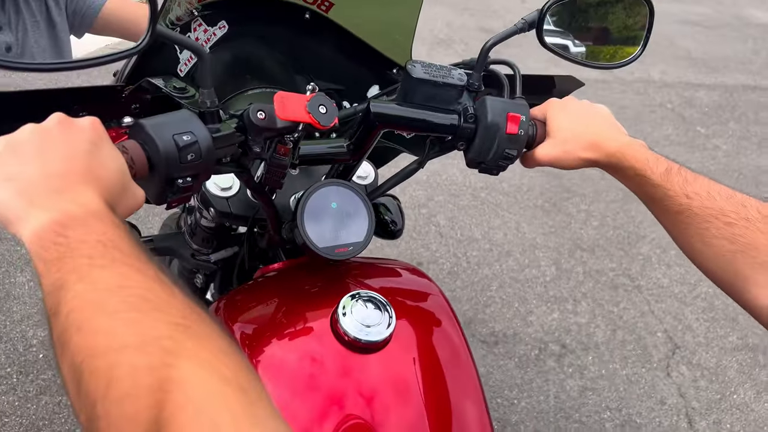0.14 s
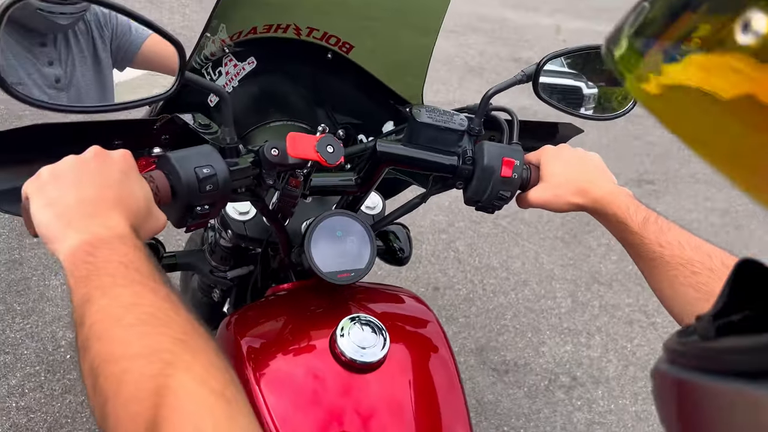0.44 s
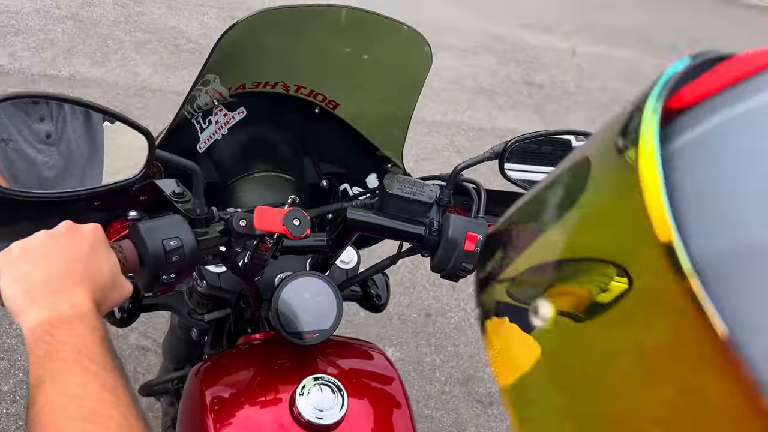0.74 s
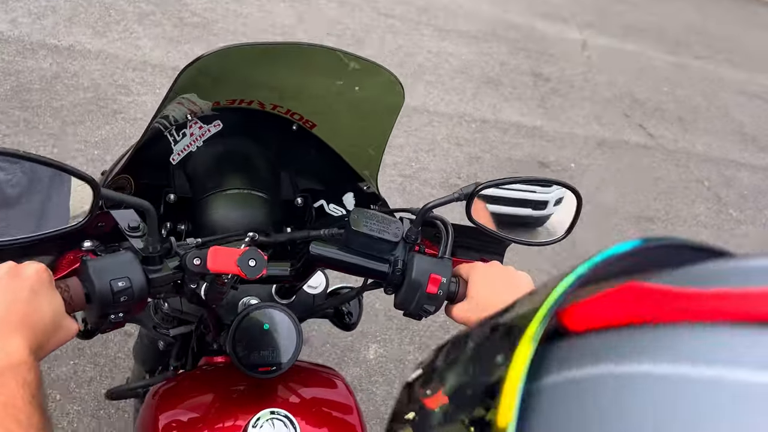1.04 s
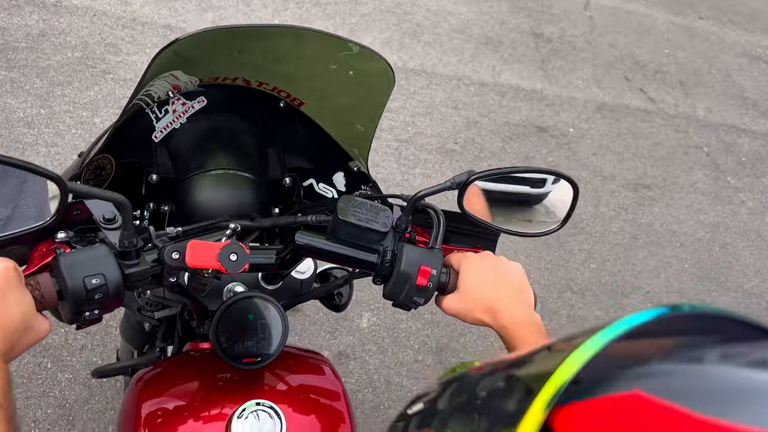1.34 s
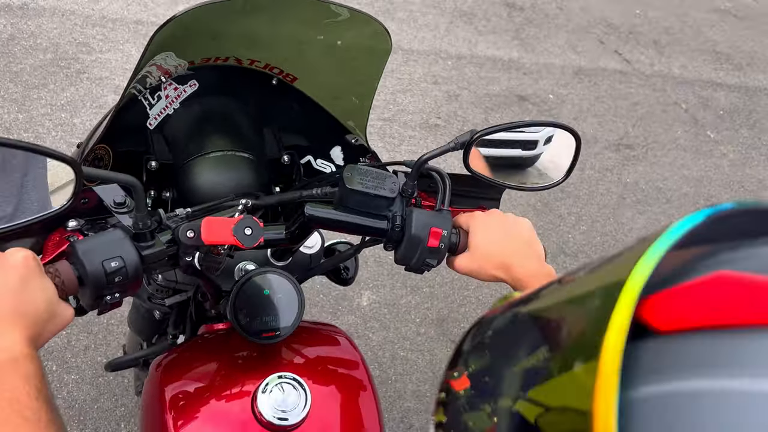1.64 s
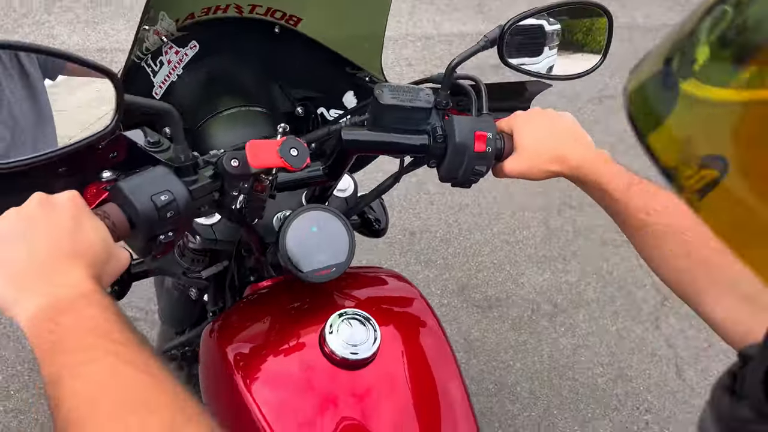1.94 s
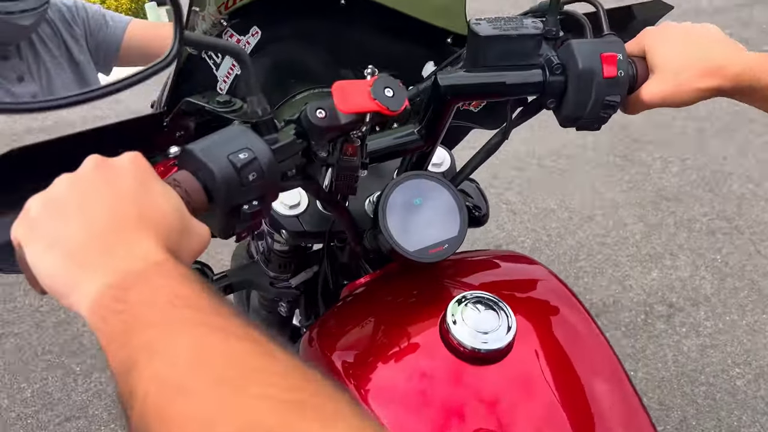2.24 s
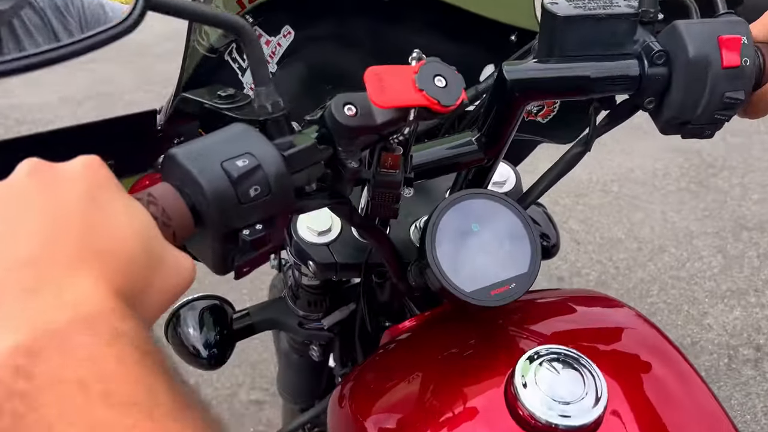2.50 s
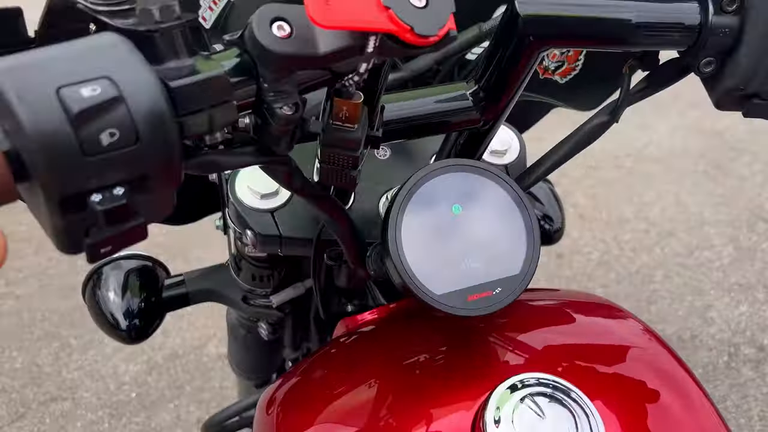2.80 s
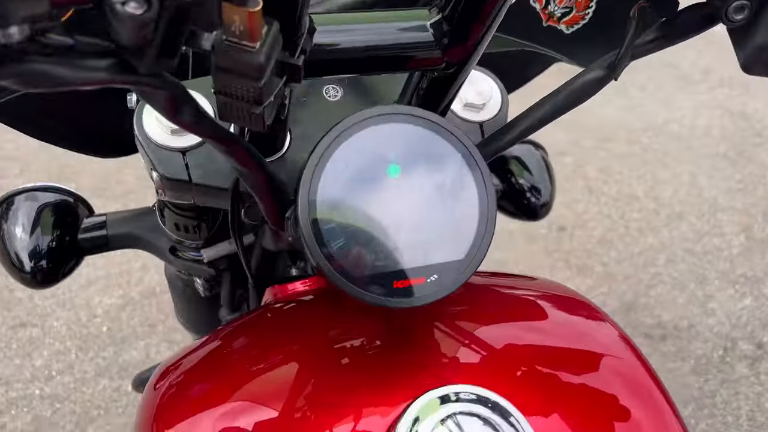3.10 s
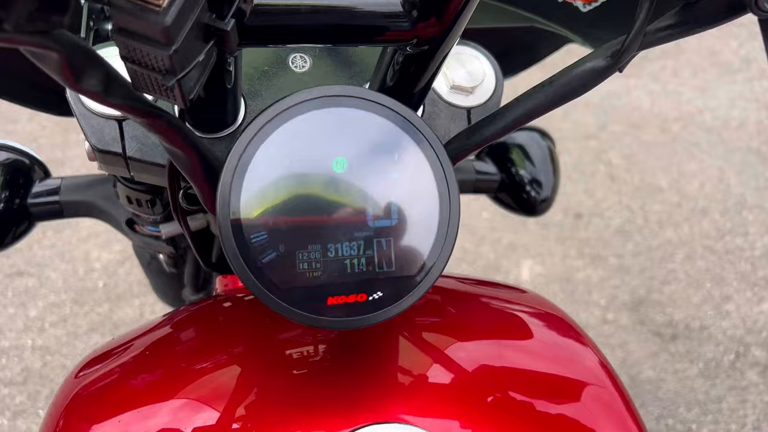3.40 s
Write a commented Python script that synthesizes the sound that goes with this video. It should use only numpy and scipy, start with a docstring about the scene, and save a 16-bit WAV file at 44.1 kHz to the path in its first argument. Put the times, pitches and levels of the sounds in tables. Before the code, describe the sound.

Motorcycle engine at steady idle outdoors: deep uneven puffs, soft intake gulps, rapid ticking and gear noise. The handheld microphone leans in past the middle, bringing the clatter nearer, with no revving.

```python
"""A loping thump, gulps of air and a metallic whirr: a V-twin motorcycle idles in a driveway.
It is heard from above the saddle, then from close over the tank. Exhaust puffs and intake gulps ring
air modes; the front cylinder fires every cycle, the rear hard only on every second, bar one slip.
Valve ticks ride on coloured noise for gears and chains; knocks and pings ring metal; bands of hiss
swell and fade. One crank-speed curve times the strokes, ticks and knocks."""
import sys
import numpy as np
from scipy import signal
from scipy.fft import rfft, irfft
from scipy.io import wavfile
from scipy.ndimage import uniform_filter1d, map_coordinates

SR = 44100
rng = np.random.default_rng(int(sys.argv[2]) if len(sys.argv) > 2 else 0)


def output_pcm(signal):
    """Save a mono or channel-first signal as 16-bit PCM at the path in sys.argv[1].

    Samples are clipped to [-1, 1] before scaling.
    """
    pcm = np.clip(np.atleast_2d(signal).T, -1, 1) * 32767
    wavfile.write(sys.argv[1], SR, np.round(pcm).astype(np.int16))


N = 156555
TIME = np.arange(N) / SR
RUN_IN = SR // 2   # samples before time zero, so that resonances already ring


def from_db(db):
    """Decibels to amplitude gain."""
    return 10 ** (np.asarray(db) / 20)


def rms_one(x):
    """Scale to rms 1."""
    return x / np.sqrt(np.mean(x ** 2) + 1e-20)


def level_curve(table):
    """Gain over time from a table of t/s, level/dB."""
    return from_db(np.interp(TIME, *np.transpose(table)))


def drift(rate_hz):
    """Slow random signal of rms 1: noise through a two-pole low-pass at 1/40 of the sample rate."""
    step = 40
    pole = np.exp(-2 * np.pi * rate_hz * step / SR)
    white = rng.standard_normal(N // step + 2002)
    slow = signal.lfilter([1], [1, -2 * pole, pole ** 2], white)[2000:]
    return np.interp(np.arange(N) / step, np.arange(len(slow)), rms_one(slow))


def noise(spectrum):
    """Noise of rms 1 shaped by f/Hz, density/dB; falls 12 dB per octave more below the first point."""
    hz, db = np.transpose(spectrum)
    f = np.maximum(np.fft.rfftfreq(N, 1 / SR), 1)
    gain = from_db(np.interp(np.log(f), np.log(hz), db))
    gain = gain * np.minimum(f / hz[0], 1) ** 2
    return rms_one(irfft(rfft(rng.standard_normal(N)) * gain, N))


def clicks(times_s, db, scatter_db=0):
    """Impulse train with random level scatter, starting a run-in before time zero."""
    train = np.zeros(RUN_IN + N)
    at = np.round(times_s * SR).astype(int) + RUN_IN
    gain = from_db(db + scatter_db * rng.standard_normal(len(at)))
    inside = (at >= 0) & (at < len(train))
    train[at[inside]] = gain[inside]
    return train + 1e-18   # offset avoids denormals


def bursts(train, decay_s):
    """Each impulse becomes an exponential decay; run-in removed."""
    return signal.lfilter([1], [1, -np.exp(-1 / (decay_s * SR))], train)[RUN_IN:]


def ring(train, hz, t60_s):
    """Damped mode: a unit impulse starts a decaying sine of height 1; run-in removed."""
    pole = np.exp(-np.log(1000) / (t60_s * SR))
    w = 2 * np.pi * hz / SR
    return signal.lfilter([0, np.sin(w)], [1, -2 * pole * np.cos(w), pole ** 2], train)[RUN_IN:]


def resonance(x, hz, width_hz):
    """Two-pole band-pass with peak gain near 1."""
    pole = np.exp(-np.pi * width_hz / SR)
    b = np.array([1, 0, -1]) * (1 - pole ** 2) / 2
    return signal.lfilter(b, [1, -2 * pole * np.cos(2 * np.pi * hz / SR), pole ** 2], x)


LEAN_START_S, LEAN_END_S = 2.24, 2.648


def nearness(t):
    """Microphone position: 0 over the saddle, 1 over the tank."""
    return np.interp(t, [LEAN_START_S, LEAN_END_S], [0, 1])


# crank speed: t/s, speed/rpm
CRANK_SPEED = [(0.0, 1109), (0.21, 1127), (0.42, 1073), (0.63, 1072), (0.84, 1130), (1.04, 1128),
               (1.25, 1086), (1.46, 1074), (1.67, 1114), (1.88, 1122), (2.09, 1134), (2.3, 1146),
               (2.51, 1157), (2.71, 1115), (2.92, 1113), (3.13, 1114), (3.34, 1117), (3.55, 1137)]
FIRST_FIRING_S = .0571
LOPE_SLIP_S = 2.39   # the rear cylinder fires hard twice running here
HURRY_S = 0.00066    # a hard rear stroke brings the next cycle forward


def cycles(degrees=0):
    """Times at which the crank passes an angle in each 720-degree cycle; flags hard rear strokes."""
    t = np.arange(-RUN_IN, N + RUN_IN) / SR
    rpm = np.interp(t, *np.transpose(CRANK_SPEED))
    cycle_count = np.cumsum(rpm) / (120 * SR)   # two turns per cycle
    k = np.arange(-3, 34)
    firing_count = k + np.interp(FIRST_FIRING_S, t, cycle_count)
    after_slip = np.interp(firing_count, cycle_count, t) > LOPE_SLIP_S
    hard = (k % 2 == 1) ^ after_slip
    times = np.interp(firing_count + degrees / 720, cycle_count, t)
    return times - HURRY_S * np.roll(hard, 1), hard


PUFF_WIDTH_S = 0.00072   # length of each of three smoothings


def rounded(train):
    """A valve opens gradually: each impulse becomes a small bell-shaped puff."""
    for _ in range(3):
        train = uniform_filter1d(train, max(int(PUFF_WIDTH_S * SR), 1))
    return train


PUFF_SCATTER_DB = .5


def puffs(degrees, db=0, which=slice(None)):
    """Pressure puffs at a crank angle, in the chosen cycles."""
    return rounded(clicks(cycles(degrees)[0][which], db, PUFF_SCATTER_DB))


def pipe(train, modes):
    """Puffs ring the air modes of a pipe; neighbouring modes swing in opposite directions."""
    near = nearness(TIME)
    out = 0
    for k, (hz, t60_s, saddle_db, tank_db) in enumerate(modes):
        gain = from_db(saddle_db) * (1 - near) + from_db(tank_db) * near
        out = out + (-1) ** k * ring(train, hz, t60_s) * gain
    return out


# exhaust air modes, front and rear: f/Hz, t60/s, saddle level/dB, tank level/dB
FRONT_PIPE_MODES = [(67.02, 0.3, -3, -3.5), (77.3, 0.079, 0, -1.8), (129.13, 0.31, -7, -5),
                    (168.5, 0.27, -7, -6), (246, 0.03, -10.5, -7), (287.9, 0.16, -18.5, -22.5)]
REAR_PIPE_MODES = [(71.17, 0.58, -9, -25), (113.9, 0.25, -6.3, -15), (174.1, 0.16, -6.5, -3),
                   (247.1, 0.017, -21, -12)]
# low hum after a weak rear stroke: f/Hz, t60/s, saddle level/dB, tank level/dB
BOOM_MODES = [(65.5, 0.6, -9, -15.5)]
# gas turbulence colour: f/Hz, relative density/dB
GAS_COLOUR = [(25, -26), (45, -9), (100, 4.5), (170, -4), (310, -1.5), (350, -13), (400, -21), (500, -40),
              (700, -16), (2000, -65)]
HARD_DEG, WEAK_DEG, BOOM_DEG = 327.5, 283, 349   # crank angle after the front puff
REAR_WEAK_DB, GAS_DB, GAS_DECAY_S = -8, -26.5, 0.081


def exhaust(hard):
    """Front and rear puffs ring the pipes; turbulent gas rushes behind each, a hum follows weak strokes."""
    front = puffs(0)
    rear = puffs(HARD_DEG, 0, hard) + puffs(WEAK_DEG, REAR_WEAK_DB, ~hard)
    thump = pipe(front, FRONT_PIPE_MODES) + pipe(rear, REAR_PIPE_MODES)
    boom = pipe(puffs(BOOM_DEG, 0, ~hard), BOOM_MODES)
    gas = from_db(GAS_DB) * bursts(front + rear, GAS_DECAY_S) * noise(GAS_COLOUR)
    return thump + boom + gas


# intake air modes, per gulp: f/Hz, t60/s, saddle level/dB, tank level/dB
FIRST_INTAKE_MODES = [(52.7, 0.54, -24, -19), (110, 0.14, -33, -6.5), (158.2, 0.39, -18.5, -16.5)]
SECOND_INTAKE_MODES = [(74, 0.3, -24.5, -8), (123, 0.4, -17.5, -10), (172.3, 3.9, -31, -49)]
FIRST_GULP_DEG, SECOND_GULP_DEG = 263, 500   # crank angle after the front puff


def intake():
    """Two gulps per cycle ring the intake air."""
    first = pipe(puffs(FIRST_GULP_DEG), FIRST_INTAKE_MODES)
    second = pipe(puffs(SECOND_GULP_DEG), SECOND_INTAKE_MODES)
    return first + second


# valve ticks: t/s after front firing, mean level/dB over the whirr
VALVE_TICKS = [(.005, -19), (0.042, 2), (.094, 0.5)]
TICK_DECAY_S, TICK_SCATTER_DB = 0.0014, 4


def valve_ticks(starts):
    """Decaying envelopes of the valve ticks, relative to the whirr."""
    train = sum(clicks(starts + s, db, TICK_SCATTER_DB) for s, db in VALVE_TICKS)
    return bursts(train, TICK_DECAY_S)


# whirr level before trim, flutter and swing: t/s, level/dB
WHIRR_LEVEL_CURVE = [(0.0, -41), (0.01, -33), (0.93, -34), (0.98, -35.5), (2.65, -31), (2.75, -29.5),
                     (3.54, -29.5), (3.55, -39)]
# whirr colour at saddle and tank: f/Hz, relative density/dB
SADDLE_COLOUR = [(420, 3), (500, 6.5), (570, 2), (650, 1.5), (1300, 0.5), (1800, -2.5), (2400, -6),
                 (2750, -10.5), (3200, -8.5), (5600, -9), (6800, -16), (8300, -16.5), (11000, -11.5),
                 (12600, -12), (14000, -15.5), (15500, -14)]
TANK_COLOUR = [(420, -8.5), (490, -0.5), (580, -10.5), (800, -2.5), (1000, 0.5), (1500, -8), (1800, -7),
               (2400, -10), (3400, -12.5), (5600, -13.5), (6800, -19.5), (8300, -22.5), (11000, -15),
               (12600, -17.5), (14000, -18), (15500, -23.5)]
WHIRR_TRIM_DB, WHIRR_FLUTTER_DB, FLUTTER_HZ = 1.06, 1.17, 51
WHIRR_SWING_DB = 0.62   # swell peaking at each front firing


def whirr(starts):
    """Gears and chains: coloured noise, crossfaded with position, with valve ticks added in power."""
    near = nearness(TIME)
    hum = np.sqrt(1 - near) * noise(SADDLE_COLOUR) + np.sqrt(near) * noise(TANK_COLOUR)
    cycle_phase = np.interp(TIME, starts, np.arange(len(starts)))
    swing_db = WHIRR_SWING_DB * np.cos(2 * np.pi * cycle_phase)
    gain = from_db(WHIRR_TRIM_DB + WHIRR_FLUTTER_DB * drift(FLUTTER_HZ) + swing_db)
    return hum * np.sqrt(1 + valve_ticks(starts) ** 2) * gain * level_curve(WHIRR_LEVEL_CURVE)


# crankcase resonances: f/Hz, width/Hz, gain/dB over the whirr
CASE_MODES = [(465, 17, -32), (934, 94, -3), (1260, 28, -35), (1680, 39, -8), (2175, 31, -4),
              (6100, 110, 0), (8870, 140, -5), (12450, 200, -5), (15115, 150, -16)]


def crankcase(x):
    """Case walls reinforce the machinery at their own frequencies."""
    return x + sum(from_db(db) * resonance(x, hz, width_hz) for hz, width_hz, db in CASE_MODES)


# cylinder knocks: t/s after front firing, mean saddle level/dB, mean tank level/dB
CYLINDER_KNOCKS = [(.003, -39.5, -33), (0.0242, -34.5, -29.5)]
# knock colour: f/Hz, relative density/dB
KNOCK_SPECTRUM = [(400, -4.5), (800, -4), (1300, 2), (1800, -8.5), (2600, -12), (6000, -58)]
# cylinder fins: f/Hz, t60/s, level/dB over the knock
FIN_MODES = [(827, 0.046, -2.5), (973, 0.13, -11), (1292, 0.087, -12), (1465, 0.041, -5.5),
             (1746, 0.18, -13)]
KNOCK_DECAY_S, KNOCK_SCATTER_DB = 0.0054, 4


def knocks(starts):
    """Knocks in every cycle: a dull noise burst plus the ringing cylinder fins."""
    near = nearness(starts)
    train = 0
    for s, saddle_db, tank_db in CYLINDER_KNOCKS:
        db = saddle_db + (tank_db - saddle_db) * near
        train = train + clicks(starts + s, db, KNOCK_SCATTER_DB)
    fins = sum(from_db(db) * ring(train, hz, t60_s) for hz, t60_s, db in FIN_MODES)
    return bursts(train, KNOCK_DECAY_S) * noise(KNOCK_SPECTRUM) + fins


# louder ringing combustion knocks: t/s, level/dB
RINGING_KNOCKS = [(.079, -28), (.208, -29), (.426, -25), (.650, -25.5), (0.869, -22.5), (1.086, -32),
                  (1.525, -28), (2.455, -25.5), (2.69, -29), (2.90, -22), (3.098, -24), (3.198, -23)]
PING_HZ, PING_T60_S = 1300, .05


def pings():
    """Sharp combustion knocks now and then ring as one damped mode."""
    return ring(clicks(*np.transpose(RINGING_KNOCKS)), PING_HZ, PING_T60_S)


# loose-part clicks: t/s, level/dB
LOOSE_CLICKS = [(0.419, -26), (1.407, -21), (3.365, -17)]
CLICK_DECAY_S = 0.00062


def loose_parts():
    """Single clicks: very short bursts of white noise."""
    return bursts(clicks(*np.transpose(LOOSE_CLICKS)), CLICK_DECAY_S) * rng.standard_normal(N)


# hiss near 7 kHz: t/s, level/dB
HISS_LEVEL_CURVE = [(0, -38), (.28, -50), (.5, -38.5), (.9, -42.5), (1.1, -48), (1.6, -47.5), (1.8, -40.5),
                    (2.2, -41.5), (2.35, -43.5), (3.55, -39.5)]
# hiss colour: f/Hz, relative density/dB
HISS_COLOUR = [(5800, -27), (6300, 0), (7400, 1.5), (8000, -14)]


def hiss():
    """A band of noise near 7 kHz that swells and fades."""
    return level_curve(HISS_LEVEL_CURVE) * noise(HISS_COLOUR)


# echoes off tank, screen and rider: mean delay/s, level/dB
ECHO_PATHS = [(.0007, -22.5), (.0016, -13.5), (.0045, -12.5)]
SWAY, SWAY_HZ = 0.0632, 0.484   # rms change of delay as a fraction, and its rate


def reflections(x):
    """Direct sound plus short echoes whose delays drift as the microphone sways."""
    out = x
    for delay_s, db in ECHO_PATHS:
        read_s = TIME - delay_s * (1 + SWAY * drift(SWAY_HZ))
        out = out + from_db(db) * map_coordinates(x, [read_s * SR], order=3)
    return out


# airy hiss levels: t/s, level/dB of the first band, level/dB of the second band
AIRY_LEVEL_CURVES = [(0, -46, -47), (.6, -45, -52), (1, -45, -45), (1.45, -43.5, -44), (1.75, -43, -48),
                     (2, -47, -47), (2.4, -46, -48), (3.55, -57, -47)]
# airy hiss bands: f/Hz, width/Hz of each of two filter passes
AIRY_BANDS = [(2740, 220), (12720, 730)]


def airy_hiss():
    """Two narrow bands of noise, near 2.7 and 12.7 kHz, that swell and fade."""
    t, *levels = np.transpose(AIRY_LEVEL_CURVES)
    out = 0
    for (hz, width_hz), db in zip(AIRY_BANDS, levels):
        band = resonance(rng.standard_normal(N), hz, width_hz)
        band = rms_one(resonance(band, hz, width_hz))
        out = out + from_db(np.interp(TIME, t, db)) * band
    return out


def scene():
    """The whole engine: exhaust and intake direct, machinery with echoes, airy hiss behind."""
    starts, hard = cycles()
    machinery = crankcase(whirr(starts)) + hiss()
    metal = knocks(starts) + pings() + loose_parts()
    return (exhaust(hard) + intake() + reflections(machinery + metal) + airy_hiss())[None]


LOW_CUT_HZ, CUTOFF_HZ, CEILING = 40, 15750, .95


def record(dry):
    """The microphone sheds the deepest bass, rounds the peaks and cuts the top."""
    x = signal.sosfilt(signal.butter(3, LOW_CUT_HZ, "high", fs=SR, output="sos"), dry)
    x = x / (1 + (x / CEILING) ** 4) ** (1 / 4)
    return signal.sosfilt(signal.ellip(12, .1, 90, CUTOFF_HZ, fs=SR, output="sos"), x)


dry = scene()
out = record(dry)
output_pcm(out)
```